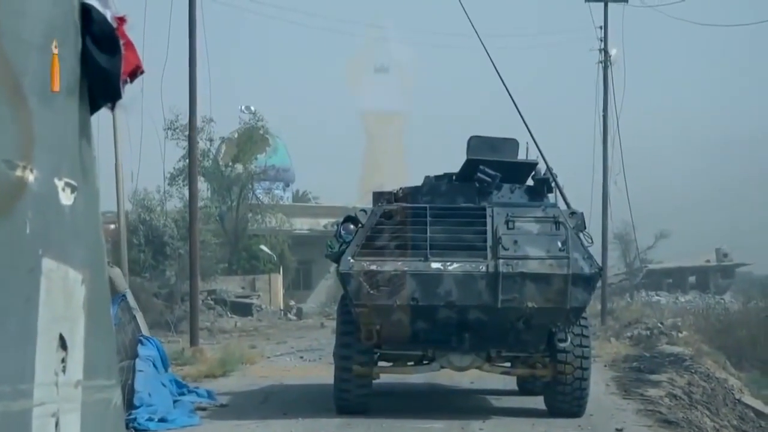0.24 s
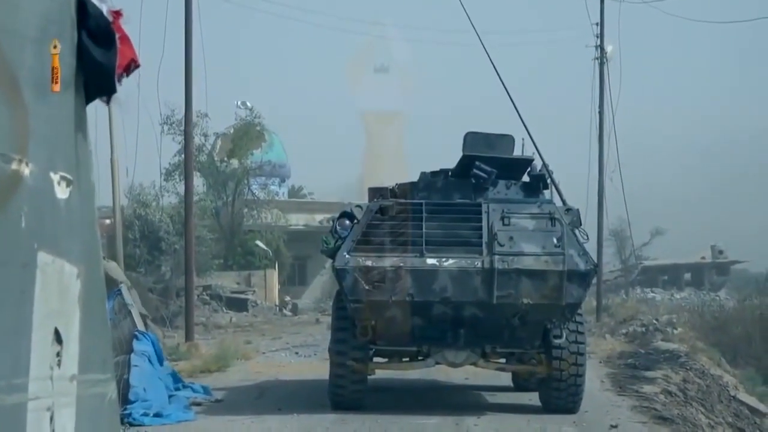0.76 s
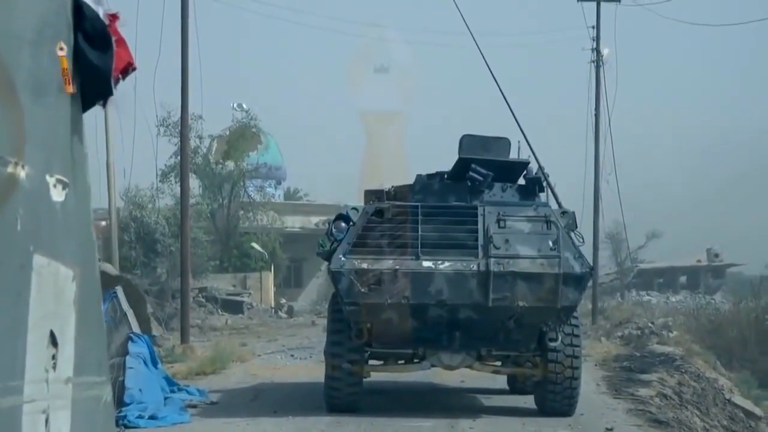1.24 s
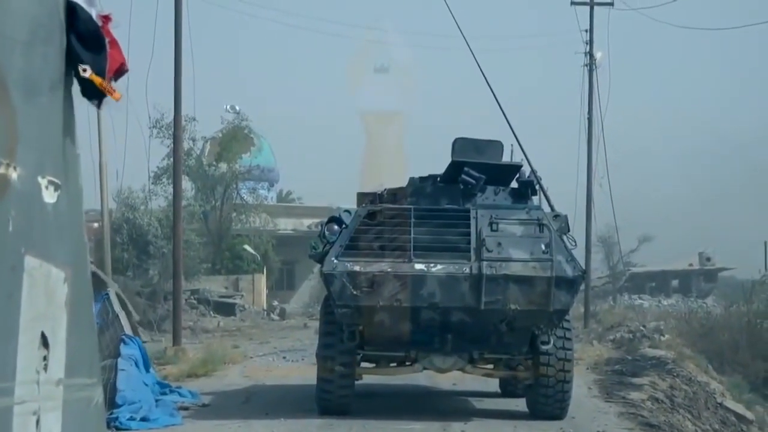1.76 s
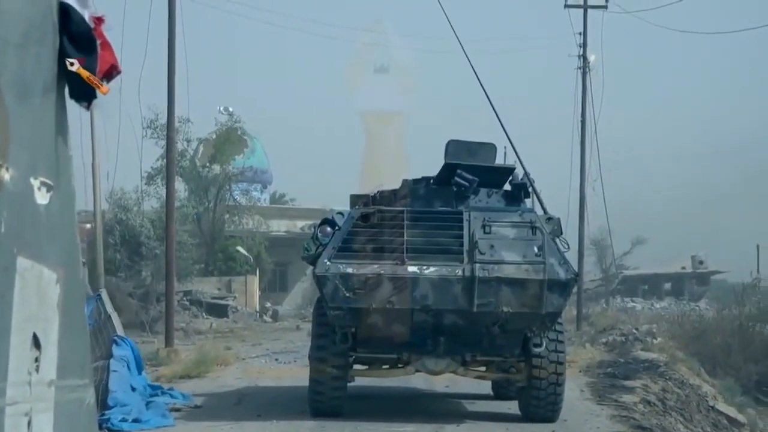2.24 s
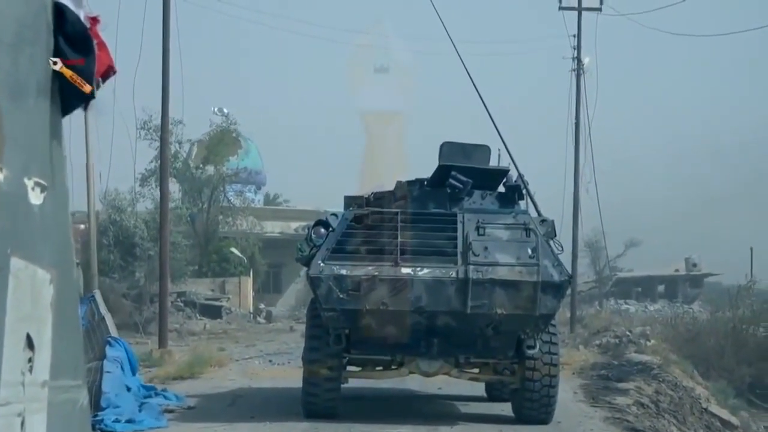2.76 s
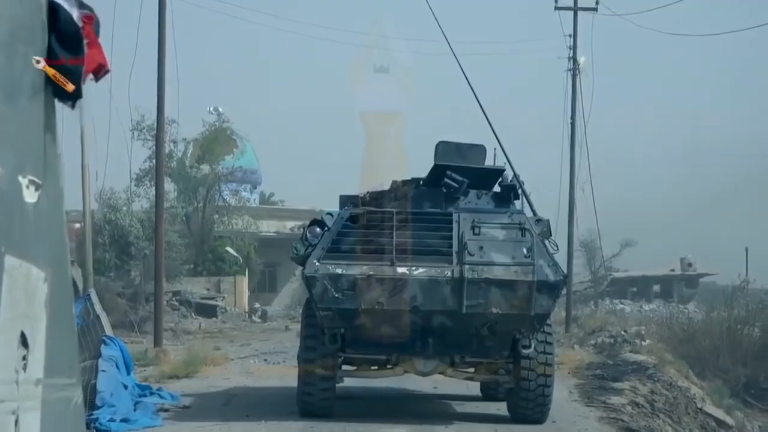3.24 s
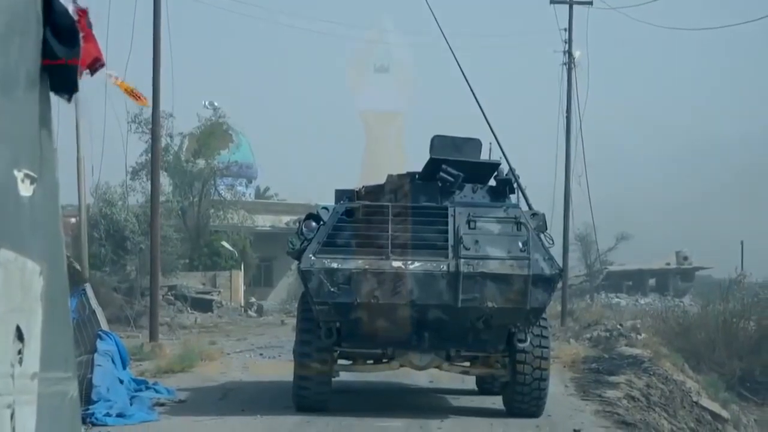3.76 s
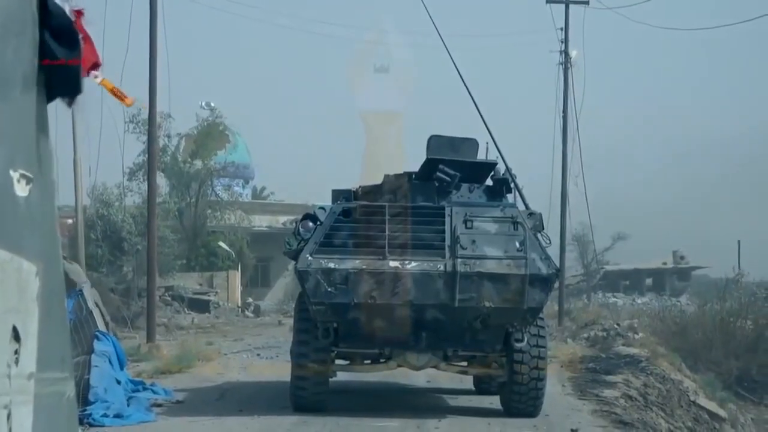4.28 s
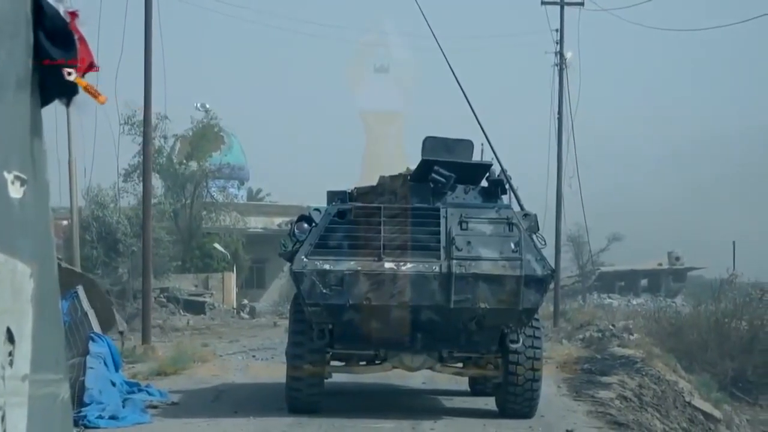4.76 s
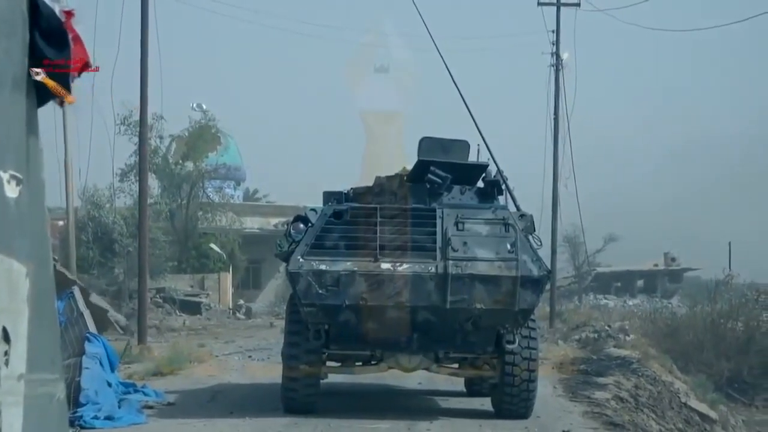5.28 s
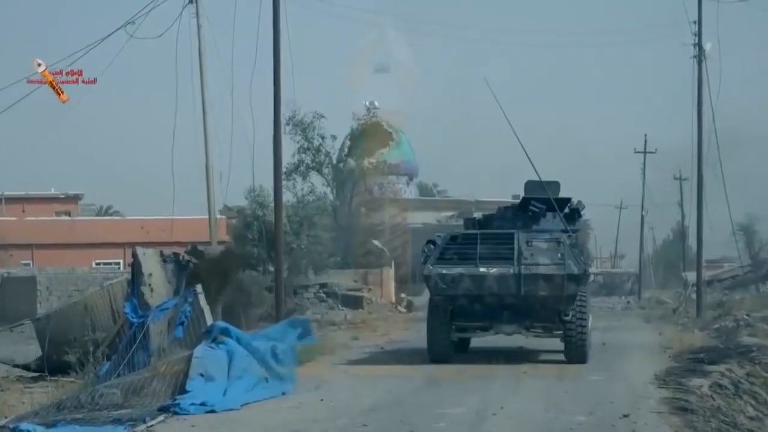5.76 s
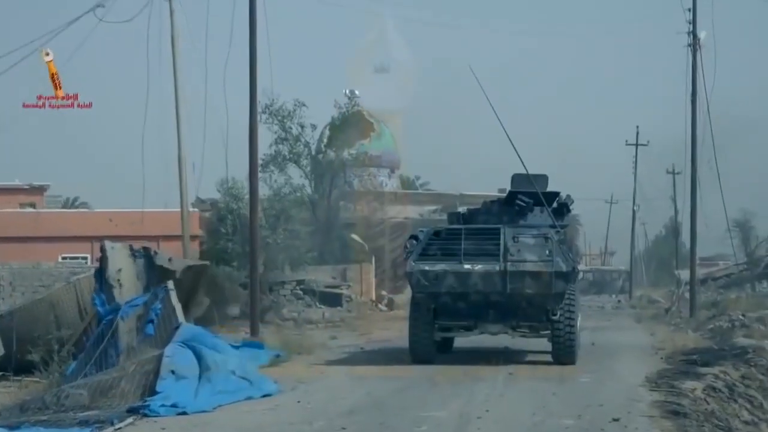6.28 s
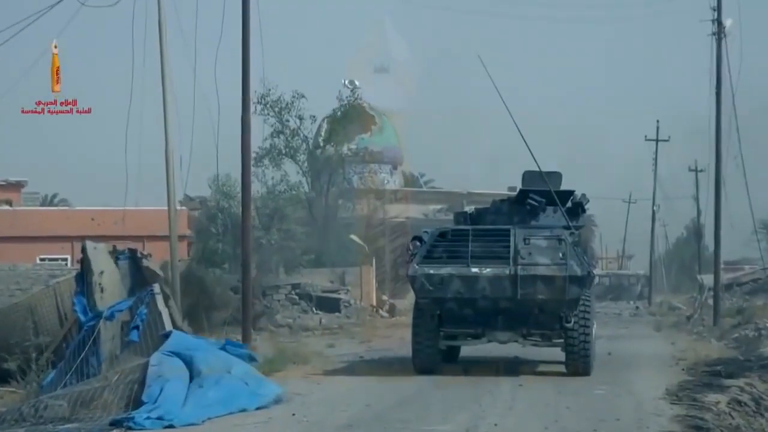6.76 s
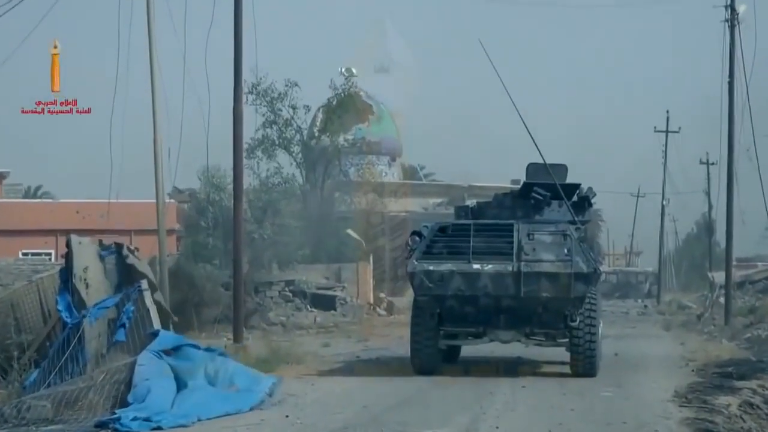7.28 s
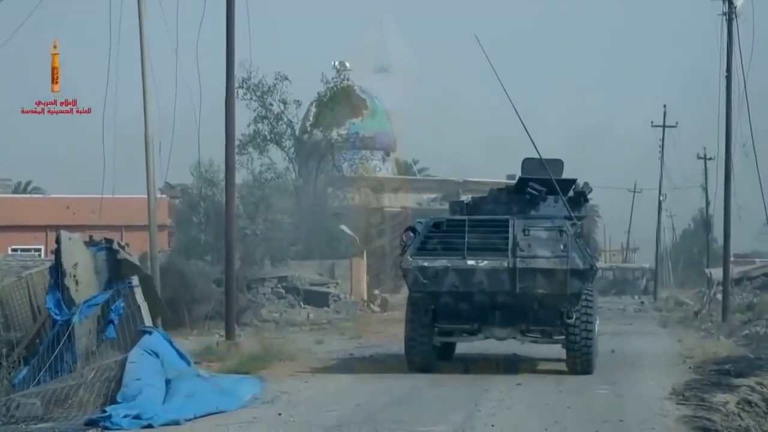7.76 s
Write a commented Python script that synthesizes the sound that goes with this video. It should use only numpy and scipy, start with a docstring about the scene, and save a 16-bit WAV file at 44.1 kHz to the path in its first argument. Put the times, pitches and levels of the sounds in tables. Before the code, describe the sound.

Several sharp shots, some in quick pairs, ring out with the crackle of passing bullets and echo off distant buildings. Underneath, an armoured vehicle's engine hums quietly and slowly grows louder. Then a heavy machine gun breaks in and hammers steadily almost to the end, with a short metallic ring and street echo on every round, loud enough to distort the microphone.

```python
"""A heavy machine gun fires a long burst that overloads the microphone. Each round cracks, makes
a vehicle's armour ring and bounces back off the same walls of a village road.
Before the burst, a few single shots roll away between the houses while bullets crackle past.
Under it all the armoured vehicle idles: its exhaust hums, its fan rushes and its gears whine."""
import sys
import numpy as np
from scipy import signal
from scipy.fft import rfft, irfft, next_fast_len
from scipy.io import wavfile
from scipy.ndimage import minimum_filter1d

SR = 44100
rng = np.random.default_rng(int(sys.argv[2]) if len(sys.argv) > 2 else 0)


def wav_out(sig):
    """Save sig, one row per channel (or a flat mono array), as 16-bit PCM at SR to the path in sys.argv[1]."""
    wavfile.write(sys.argv[1], SR, np.round(np.clip(np.atleast_2d(sig).T, -1, 1) * 32767).astype(np.int16))


N = 353682
TIME = np.arange(N) / SR
SHORT, LONG = TIME[:SR // 5], TIME[:3 * SR // 2]   # clocks for one bang and for its echo


# the rounds of the burst: t/s, level/dB
BURST_ROUNDS = [(5.129, 3), (5.302, 6), (5.4797, 1), (5.6529, 4), (5.819, 3), (5.9902, 3.5), (6.1469, 0.5),
                (6.3135, 0), (6.483, -0.5), (6.6576, -.5), (6.8362, -0.5), (7.0072, -1), (7.1906, .5),
                (7.3791, 1.5), (7.5533, 0.5), (7.7267, 0.5), (7.8948, 0)]
# the notes the armour rings with: f/Hz, level/dB, time to fade by 60 dB/s
ARMOUR_NOTES = [(226, -7, 0.033), (366, -14.5, 0.0073), (614, -14, 0.048), (880, -2, 0.022),
                (1173, -2, 0.02), (1290, -20, 0.011)]
# slaps off the walls: delay/s, level against the round in mid-burst/dB, smear/s, level change/(dB/s)
WALL_SLAPS = [(.0162, 0, 0.0076, -0.5), (.024, -1.5, 0.026, 0), (.091, -3, 0.0057, 2.1),
              (.099, -20, .022, -9), (.152, -8.5, .015, 3), (0.1709, -7, 0.02, 2)]
# low booms that come back: delay/s, level against the round/dB
LOW_BOOMS = [(.0092, -11), (.02, -17.5), (0.0708, -15)]

def machine_gun(heard_from_s=5.452, mid_burst_s=7.16):
    """Each round cracks, rings the armour and bounces off walls; moving air reshuffles its long echo."""
    out = np.zeros(N)
    echoes = np.array([street_echo(spread_db=10.5, onset_s=0.052, stretch=0.84) for _ in range(6)])
    notes = np.array([amp(db - 60 * SHORT / fade_s) * np.cos(2 * np.pi * hz * SHORT)
                      for hz, db, fade_s in ARMOUR_NOTES])
    for s, db in BURST_ROUNDS:
        strengths = amp(db + rng.normal(0, 1.2, len(notes)))
        add(out, s, air(strengths @ notes, hz=2800))
        add(out, s, bang(db + 5, (630, 3380), scatter_db=-1.5, fall_s=0.0066))   # muzzle blast
        add(out, s + 0.0004, bang(db - 10, (2270, 7960), scatter_db=1, fall_s=0.0044))   # bright edge
        add(out, s + 0.003, bang(db - 17, (240, 1300), scatter_db=11.5, fall_s=0.018))   # ground bounce
        for delay_s, wall_db, smear_s, db_per_s in WALL_SLAPS:
            slap_db = db + wall_db + db_per_s * (s - mid_burst_s)
            add(out, s + delay_s, bang(slap_db, (497, 3010), scatter_db=33 * delay_s, fall_s=smear_s))
        for delay_s, boom_db in LOW_BOOMS:
            add(out, s + delay_s, bang(db + boom_db, (165, 510), scatter_db=-1, fall_s=0.013))
        blend = rng.standard_normal(len(echoes))
        blend /= np.linalg.norm(blend)
        add(out, s, amp(-14) * blend @ echoes)
    return out * (TIME > heard_from_s)   # the burst breaks in suddenly, already under way


# single shots: t/s, bang level/dB, bang top f/Hz, thump level/dB, thump top f/Hz, echo level/dB
SINGLE_SHOTS = [(0.962, -0.5, 3140, -10.5, 530, -26.5), (1.0206, -1, 2170, -7, 604, -31.5),
                (1.3771, -4, 2720, -28.5, 500, -48), (1.8925, 1, 2360, -13, 616, -30.5),
                (1.9694, -14, 2170, -15, 316, -31)]

def single_shots():
    """Each bang and its low thump set the street echoing; a dull bang has a dull echo."""
    out = np.zeros(N)
    echo = street_echo(spread_db=8.5, onset_s=0.0084, stretch=1)
    for s, db, top_hz, thump_db, thump_hz, echo_db in SINGLE_SHOTS:
        crack = bang(db, (244, top_hz), scatter_db=-1, fall_s=0.0035)
        add(out, s, air(crack, 2.7 * top_hz))
        add(out, s, bang(thump_db, (138, thump_hz), scatter_db=-1.5, fall_s=0.013))
        add(out, s, amp(echo_db) * air(echo, 2.6 * top_hz))
        # a bright roll off the houses, then a low rumble off the ground
        add_swell(out, s + 0.15, echo_db - 2, (199, 1.58 * top_hz), rise_s=0.072, fall_s=0.018)
        add_swell(out, s + 0.18, echo_db - 8, (101, thump_hz), rise_s=0.084, fall_s=0.12)
    return out


def close_blast():
    """The first shot is the nearest: it has a hard core and a bright edge, and leaves a fine hiss."""
    out, s = np.zeros(N), SINGLE_SHOTS[0][0]
    add(out, s + 0.0009, bang(2.6, (706, 1060), scatter_db=-5.5, fall_s=0.00094))
    add(out, s + 0.002, bang(-16, (3000, 8000), scatter_db=8, fall_s=0.0046))
    add_swell(out, s + 0.007, -43, (5000, 14900), rise_s=0.003, fall_s=0.091)
    return out


# the crackle of passing bullets: t/s, level/dB, rise/s, fall/s
BULLET_CRACKLES = [(0.9628, -9.5, .001, 0.0049), (1.368, -34, .006, .006), (1.861, -12.5, .001, 0.0052),
                   (1.867, -14.5, 0.0017, 0.015), (1.891, -13, 0.0049, .0023), (1.966, -14.5, 0.011, 0.013)]

def passing_bullets():
    """Bullets snap past, each in a crackle of small shock waves."""
    out = np.zeros(N)
    for s, db, rise_s, fall_s in BULLET_CRACKLES:
        add(out, s, bang(db + 2.5, (800, 2910), scatter_db=-1, fall_s=0.0052))
        add_swell(out, s, db, (613, 3870), rise_s, fall_s)
    return out


# the street's echo, low to high: f/Hz, level/dB, time to fade by 60 dB at stretch 1/s
STREET_TONE = [(45.5, -37, 0.62), (92, -5.5, 1.15), (178, 3.5, 1.28), (282, 1, 1.71), (417, 0, 0.73),
               (940, 0, 0.9), (1560, -0.5, 1.34), (3530, -8, 1.55), (5050, -13.5, 0.83), (8000, -23.5, 0.6),
               (15000, -39, 0.4)]

def street_echo(spread_db, onset_s, stretch):
    """Countless reflections build up, then die away, the highest ones first."""
    reflections = clicks(len(LONG), spread_db)
    edges_hz = 32 * 2 ** (np.arange(19) / 2)   # half an octave apart
    echo, power = 0, 0
    for low, high in zip(edges_hz, edges_hz[1:]):
        hz = np.sqrt(low * high)
        shifted = np.roll(reflections, int(low) * 7)   # each band gets its own timing
        part = band(shifted, low, high) * amp(at_hz(STREET_TONE, hz))
        power += np.var(part)
        fade_s = stretch * at_hz(STREET_TONE, hz, column=2)
        echo += part * amp(-60 * LONG / fade_s)
    build_up = 1 - np.exp(-(LONG / onset_s) ** 2)
    return echo / np.sqrt(power) * build_up


# single shots coming back off far buildings: t/s, level/dB, smear/s
FAR_ECHOES = [(1.212, -19.5, 0.0088), (1.283, -25.5, 0.011), (1.428, -31, 0.0031), (1.585, -39, 0.0054),
              (2.026, -22.5, 0.01), (2.20, -33.5, .06), (2.305, -34, 0.041), (2.476, -33.5, .022),
              (2.65, -45, 0.034), (2.9, -46, 0.067)]

def far_echoes(fresh_top_hz=3500, half_as_bright_s=1):
    """Far buildings answer the single shots; the later the answer, the duller it is."""
    out = np.zeros(N)
    for s, db, smear_s in FAR_ECHOES:
        age_s = min(s - shot[0] for shot in SINGLE_SHOTS if shot[0] < s)
        top_hz = fresh_top_hz / (1 + age_s / half_as_bright_s)
        add_swell(out, s, db, (167, top_hz), rise_s=0.71 * smear_s, fall_s=smear_s)
    return out


# how loud the idle is heard from moment to moment, in groups of rows: t/s, relative hum level/dB, relative fan
# level/dB
IDLE_LEVELS = [
    [(0.0, -48, -47.5), (0.19, -51, -45), (0.9, -44, -43.5)],
    [(1.6, -51, -47.5), (1.84, -50, -47)],
    [(2.6, -52, -44.5), (2.68, -49, -44.5), (5.4, -39, -38.5)],
]
# exhaust tones: cycles per turn of the crank, relative level/dB
EXHAUST_TONES = [(1, -22.5), (2, -23.5), (3, -22.5), (4, -24.5), (6, -1.5), (12, -15)]
# fan rush and clatter, low to high: f/Hz, relative level/dB
FAN_TONE = [(30, -46), (85, -25), (135, -6), (260, -7.5), (390, -9.5), (600, -6.5), (950, 4), (1120, 1.5),
            (1450, -4.5), (2000, -3), (3000, -11.5), (4500, -20), (8000, -34), (11000, -41.5), (15000, -40)]
# fan and gear whines: f/Hz, width/Hz, level against the rush/dB
FAN_WHINES = [(573, 13, -21), (915, 30, -12.5), (1060, 12, -14.5), (1110, 18, -11), (1240, 21, -28),
              (1907, 36, -20), (3815, 180, -21.5), (5420, 400, -28.5)]

def idling_engine(crank_hz=38.37, hiss_above_hz=4570):
    """The exhaust hums in step with the crank; fan and gears whine over a pulsing clatter."""
    times, hum_db, fan_db = np.vstack(IDLE_LEVELS).T
    hum_db, fan_db = np.interp(TIME, times, hum_db), np.interp(TIME, times, fan_db)
    crank_angle = 2 * np.pi * np.cumsum(crank_hz * (1 + 0.0023 * drift(13))) / SR
    hum = 0
    for cycles, db in EXHAUST_TONES:
        strength = np.sqrt(2) * amp(db + 1.5 * drift(19))
        hum += strength * np.sin(cycles * crank_angle + rng.uniform(0, 2 * np.pi))
    rush = rms_one(colour(rng.standard_normal(N), FAN_TONE))
    rush *= 1 + 0.12 * np.sin(crank_angle)   # pulses as the engine fires
    for hz, width_hz, db in FAN_WHINES:
        phase = 2 * np.pi * hz * TIME
        rush += amp(db) * (drift(width_hz) * np.cos(phase) + drift(width_hz) * np.sin(phase))
    dull = signal.sosfiltfilt(signal.butter(2, hiss_above_hz, fs=SR, output="sos"), rush)
    hiss = (rush - dull) * amp(0.32 * (fan_db - fan_db.mean()))   # a louder fan is brighter
    return amp(hum_db - 2) * hum + amp(fan_db + 1.5) * (dull + hiss)


# faint rustles: t/s, level/dB
NEAR_RUSTLES = [(.32, -41), (3.19, -42)]
# small ticks: t/s, level/dB, fall/s
NEAR_TICKS = [(.328, -57, 0.024), (.366, -65, .012), (3.14, -58, .004), (3.194, -50, .005)]

def rustles_and_ticks():
    """Soft rustles and sharp little ticks sound close by."""
    out = np.zeros(N)
    for s, db in NEAR_RUSTLES:
        add_swell(out, s, db, (115, 2900), rise_s=0.12, fall_s=0.092)
    for s, db, fall_s in NEAR_TICKS:
        add_swell(out, s, db, (2000, 15000), rise_s=0.001, fall_s=fall_s)
    return out


def bang(db, band_hz, scatter_db, fall_s):
    """One sharp push of air, followed by its scatter off nearby things."""
    pulse = band(signal.unit_impulse(len(SHORT)), *band_hz)
    shape = np.exp(-SHORT / fall_s) * (1 - np.exp(-SHORT / 0.0011))
    scatter = band(clicks(len(SHORT), spread_db=3) * shape, *band_hz)
    scatter = amp(scatter_db) * rms_one(scatter) * np.std(pulse)
    return amp(db) * (pulse + scatter) / pulse.max()


def add_swell(out, peak_s, db, band_hz, rise_s, fall_s):
    """Mix in a cloud of tiny clicks that grows until peak_s, then fades."""
    t = TIME[:SR] - 0.5
    shape = np.exp(-np.maximum(-t / rise_s, t / fall_s))
    cloud = band(band(clicks(SR, spread_db=6.5), *band_hz), *band_hz)
    add(out, peak_s + t[0], amp(db) * shape * rms_one(cloud))


def clicks(count, spread_db):
    """Tightly packed clicks of very unequal size."""
    return rms_one(rng.standard_normal(count) * amp(spread_db * rng.standard_normal(count)))


def drift(rate_hz):
    """A random wander, about 1 in size."""
    points = rng.standard_normal(4096)
    return rms_one(np.interp(TIME * rate_hz, np.arange(len(points)), points))


def air(x, hz):
    """Distance takes away the treble above hz."""
    return signal.sosfilt(signal.butter(2, hz, fs=SR, output="sos"), x + 1e-18)


def band(x, low_hz, high_hz):
    """Keep what lies between two frequencies."""
    return signal.sosfilt(signal.butter(2, [low_hz, high_hz], "band", fs=SR, output="sos"), x + 1e-18)


def colour(x, tone):
    """Turn each frequency up or down as a table says."""
    size = 2 * next_fast_len(len(x))
    gains = amp(at_hz(tone, np.arange(size // 2 + 1) * SR / size))
    cepstrum = irfft(np.log(gains))
    cepstrum[1:size // 2] *= 2   # folded so that the filter rings only after a sound, never before
    cepstrum[size // 2 + 1:] = 0
    return irfft(rfft(x, size) * np.exp(rfft(cepstrum)))[:len(x)]


def at_hz(rows, hz, column=1):
    """Read a table between its frequencies."""
    rows = np.array(rows)
    return np.interp(np.log(hz + 1e-9), np.log(rows[:, 0]), rows[:, column])


def add(out, s, sound):
    """Mix a sound in from time s on."""
    start = round(s * SR)
    sound, start = sound[max(-start, 0):], max(start, 0)
    out[start:start + len(sound)] += sound[:max(N - start, 0)]


def amp(db):
    """Turn decibels into a multiplier."""
    return 10 ** (np.asarray(db) / 20)


def rms_one(x):
    """Scale to an average power of 1."""
    return x / np.sqrt(np.mean(x ** 2) + 1e-20)


# what the microphone boosts and cuts: f/Hz, level/dB
MICROPHONE_TONE = [(30, 8.5), (2800, -2), (3700, -0.5), (4300, -3.5), (4900, -1.5), (5600, 3), (6700, -1),
                   (7800, 4.5), (8600, -2.5), (12000, -4), (16000, -4)]

def scene():
    """All sources, heard through one small microphone."""
    mix = idling_engine() + single_shots() + close_blast() + passing_bullets()
    mix = mix + far_echoes() + rustles_and_ticks() + machine_gun()
    return colour(mix, MICROPHONE_TONE)[None]


def gain_control(x, threshold_db, slope, hold_s, release_db_per_s, attack_s):
    """Loud peaks turn the volume down; it stays there briefly, then comes back."""
    wanted_cut_db = slope * np.maximum(20 * np.log10(np.abs(x) + 1e-9) - threshold_db, 0)
    size = 2 * int(hold_s * SR / 2) + 1
    held_db = -minimum_filter1d(-wanted_cut_db, size, origin=size // 2)
    recovery_db = release_db_per_s * TIME
    cut_db = np.maximum.accumulate(held_db + recovery_db) - recovery_db
    smoothing = np.exp(-1 / (attack_s * SR))
    return x * amp(-signal.lfilter([1 - smoothing], [1, -smoothing], cut_db))


def record(dry):
    """Blasts push the volume down and flatten against a ceiling; the highest treble is cut."""
    ceiling, cutoff_hz = 0.74, 16000
    ducked = gain_control(dry[0], threshold_db=-1, slope=0.71, hold_s=0.043,
                          release_db_per_s=400, attack_s=0.031)
    flattened = ducked / (1 + (ducked / ceiling) ** 4) ** 0.25
    return signal.sosfilt(signal.ellip(10, 0.1, 80, cutoff_hz, fs=SR, output="sos"), flattened)[None]


dry = scene()
out = record(dry)
wav_out(out)
```